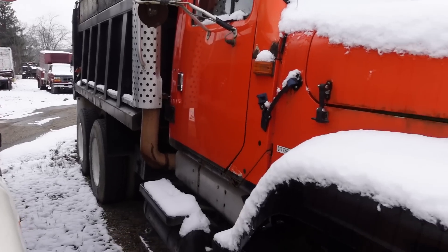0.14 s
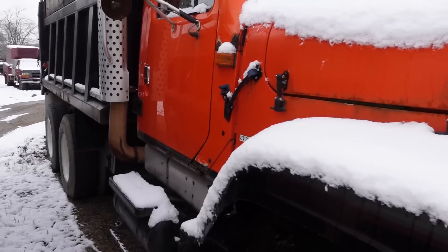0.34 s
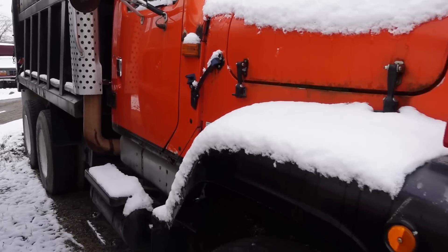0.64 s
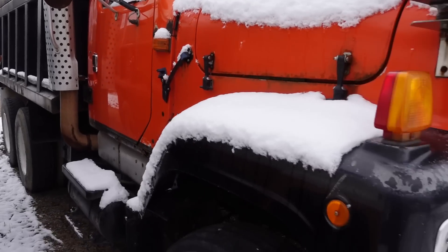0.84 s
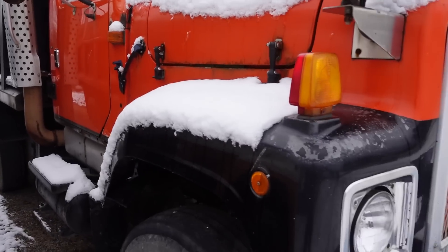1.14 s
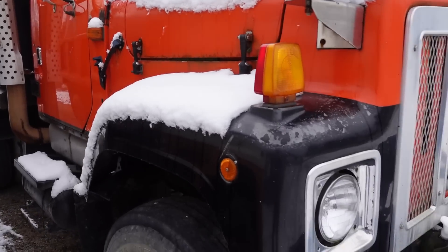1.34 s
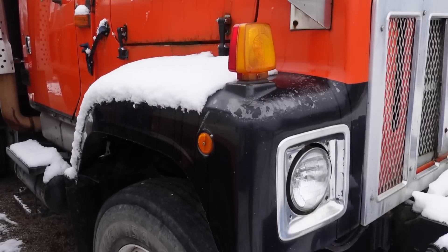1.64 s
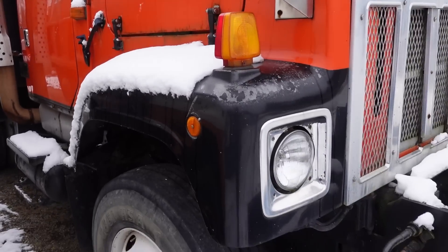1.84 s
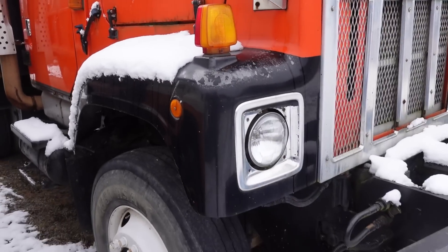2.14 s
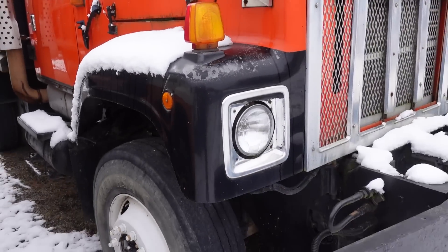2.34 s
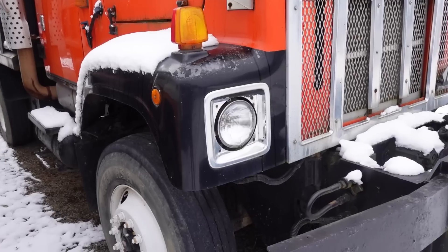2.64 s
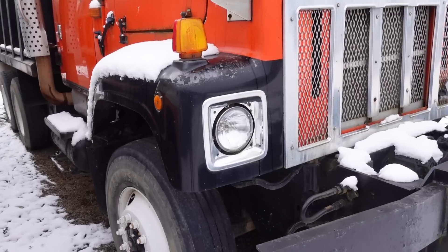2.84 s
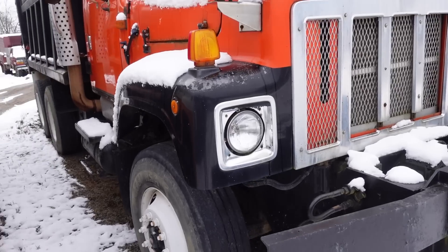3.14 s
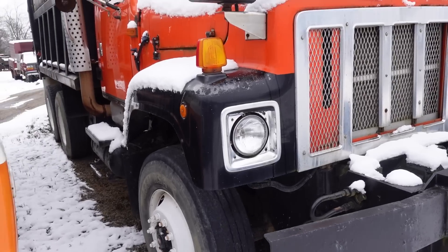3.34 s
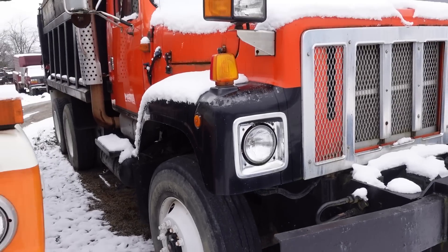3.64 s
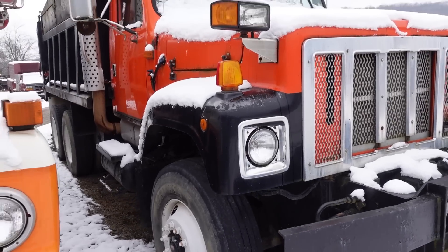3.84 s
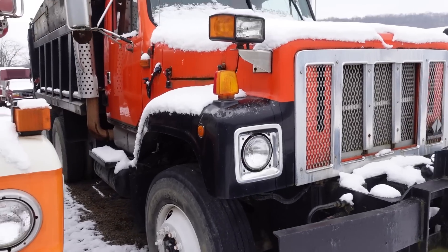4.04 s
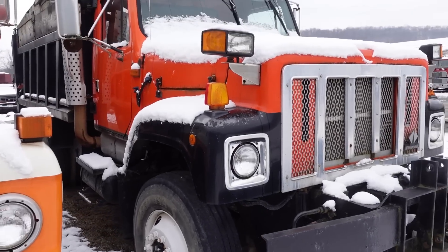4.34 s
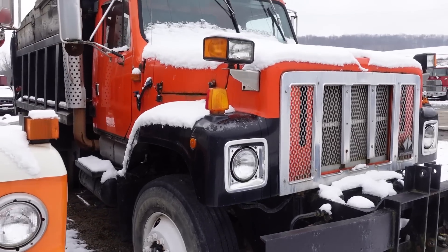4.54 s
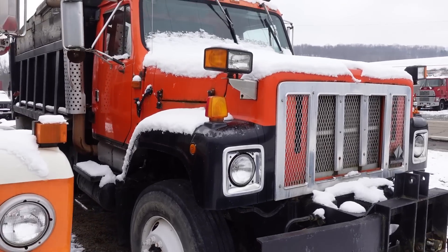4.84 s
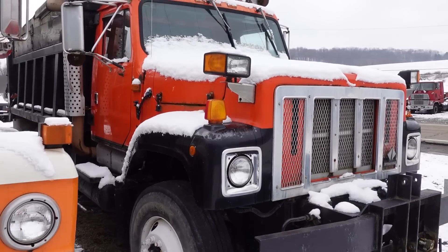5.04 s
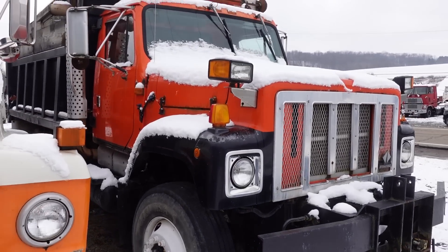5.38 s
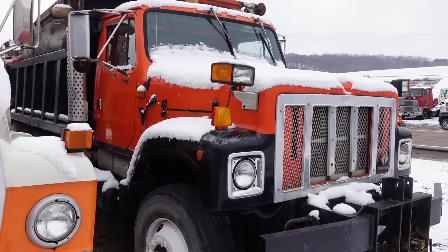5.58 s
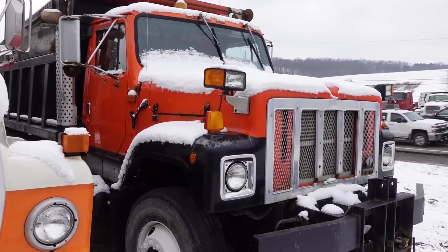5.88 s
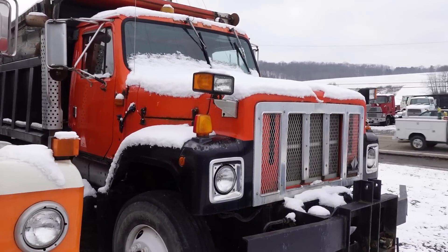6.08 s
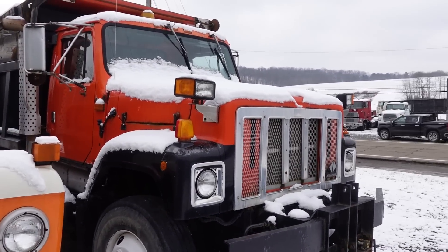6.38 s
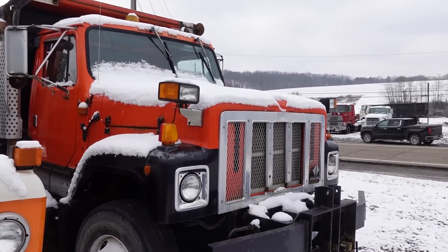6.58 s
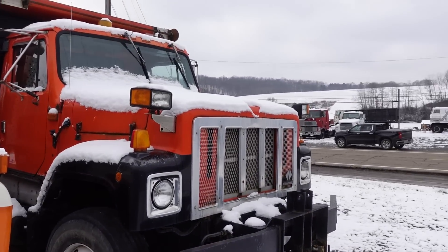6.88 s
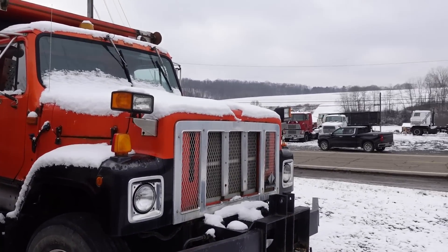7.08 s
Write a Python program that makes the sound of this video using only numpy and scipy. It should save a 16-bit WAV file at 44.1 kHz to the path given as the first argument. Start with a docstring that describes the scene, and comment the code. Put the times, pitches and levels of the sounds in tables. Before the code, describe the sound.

A heavy truck recedes on a slushy road with a sinking tyre whine, then cars and pickups hiss past in wet surges over faint distant traffic.

```python
"""Traffic passes on a slushy road, heard from between parked trucks in a snowy yard.
First a heavy truck recedes: its diesel drones and its tyres sing one sinking note; a drip ticks, a thin sizzle swells.
Then two cars pass, wheels slap through a rut, and two pickups follow; far traffic murmurs throughout.
Each vehicle is filtered noise: low rumble, tread roar, and droplet-laden spray and mist that dull with distance.
Splashes and howls are short bands of noise; engines and song are sines with wandering pitch."""
import sys
import numpy as np
from scipy import signal
from scipy.fft import rfft, irfft, next_fast_len
from scipy.io import wavfile

SR = 44100
rng = np.random.default_rng(int(sys.argv[2]) if len(sys.argv) > 2 else 0)


def master(y):
    """Save y as 16-bit WAV."""
    cut = np.clip(np.atleast_2d(y).T, -1, 1)
    pcm = np.round(cut * 32767)  # scale
    wavfile.write(sys.argv[1], SR, pcm.astype(np.int16))


N = 318137
TIME_S = np.arange(N) / SR
FREQ_HZ = np.maximum(np.fft.rfftfreq(next_fast_len(N, real=True), 1 / SR), 1)

# Truck, car, next car, two pickups. Each row: nearest at s, time to travel its nearest distance in s,
# clears the parked trucks at s, out of view at s, rumble, tread roar, spray and mist level in dB
# before wander, shadow and distance, left minus right in dB when nearest and its swing in dB, before pan share.
PASSES = [(0.14, 0.8, -2.0, -1.5, -28.8, -21.2, -33.4, -48.2, -7.3, 2.8),
          (3.29, 0.47, 2.7, 3.75, -40.3, -23.7, -30.5, -50.2, -5.5, -3.1),
          (4.38, 0.48, 3.6, 3.7, -48, -27.2, -46.3, -69.5, -6.8, 3.5),
          (6.33, 0.6, 5.59, 6.8, -37.4, -21.8, -29.6, -44.5, -4.5, -2.9),
          (7.2, 0.4, 6.65, 7.05, -52, -28.8, -43, -85, -6, -2)]
# Uneven slush: brief rises and dips of tyre noise. Each row: centre in s, 1/e half-width in s,
# tread roar change in dB, spray and mist change in dB, negative for a dip.
SLUSH_CHANGES = [(0.64, 0.05, 1.8, 1.2), (1.13, 0.17, 1.8, 0.3), (2.83, 0.08, 1.2, 0),
                 (3.17, 0.05, -0.2, 1.2), (3.33, 0.045, 1.2, 0.4), (3.68, .1, -1.5, 0),
                 (3.91, 0.07, 1.0, 1.4), (4.42, 0.1, 0.7, 1.0), (5.97, 0.04, -1.0, 1.2),
                 (6.17, 0.07, 1.3, 2.3), (6.28, .035, -1.4, -1.2), (6.36, 0.035, -0.3, 1.3),
                 (6.44, .035, .9, -1), (6.52, .05, -.5, -1.2), (6.66, .03, .8, .5), (6.79, 0.05, 1.0, 2.1)]
# Laws of the parts of tyre noise. Each: power of distance by which amplitude falls, extra time hidden in s,
# share of the pan, distance lag in s, time constant of coming out of the sound shadow in s.
RUMBLE_LAW = (1.9, 0.2, 0.15, .14, .12)
ROAR_LAW = (1.29, 0.0, 0.97, 0, .08)
SPRAY_LAW = (1.38, 0.31, 1.0, -.01, .07)
MIST_LAW = (2.45, 0.35, .95, -.06, .035)
# Carcass rumble spectra. Each row: frequency in Hz, relative density in dB.
TRUCK_RUMBLE = [(25, -50), (60, -25), (120, -13), (200, -7), (280, 1.5), (340, -2.5), (400, 0.5),
                (480, 2.5), (560, 9), (640, 7.5), (760, -3), (1000, -61)]
CAR_RUMBLE = [(25, -48), (60, -27), (110, -11.5), (180, -1), (260, 4.5), (340, -1), (410, -3), (490, 1),
              (600, 10), (900, -58)]
PICKUP_RUMBLE = [(25, -48), (60, -33), (110, -15), (190, -4), (300, -3), (400, 3.5), (480, 3.5), (600, -4),
                 (900, -48.5)]
# Tread roar spectra. Each row: frequency in Hz, relative density in dB.
TRUCK_TREAD = [(360, -42.5), (620, -2), (1100, -2.5), (1240, -6), (1350, -3.5), (2000, -9), (3000, -18),
               (3900, -57), (6600, -120)]
CAR_TREAD = [(260, -41), (450, -21), (562, -11), (623, -9.5), (803, -0.5), (1260, -1), (1360, -3.5),
             (1520, -4.5), (1720, -4), (3000, -17), (3900, -30), (6600, -120)]
NEXT_CAR_TREAD = [(260, -49), (450, -22), (536, -17), (566, -12), (623, -11), (742, -6.5), (856, -4.5),
                  (1240, -1.5), (1650, -3), (2070, -9), (3000, -21.5), (3900, -26), (6600, -120)]
PICKUP_TREAD = [(260, -47), (450, -21), (608, -3.5), (675, -5), (760, -1), (980, 0), (1080, -3.5),
                (1180, 0), (1900, -5.5), (3000, -13.5), (3900, -36), (6600, -120)]
LAST_PICKUP_TREAD = [(260, -40), (450, -16), (600, -4), (850, -2), (1200, -2), (1600, -1.5), (2100, -3),
                     (3000, -15), (3900, -26), (6600, -100)]
# Spray and finer mist spectra. Each row: frequency in Hz, relative density in dB.
TRUCK_SPRAY = [(1200, -30), (2200, -2.5), (2900, -1), (3600, -1), (4300, -6.5), (5400, -7), (6400, -15),
               (7500, -21.5), (10000, -48), (14000, -70)]
SPRAY = [(1200, -40), (2200, -2.6), (2900, -0.8), (3800, -2.6), (5000, -7.8), (6200, -16), (7500, -27.5),
         (10000, -52), (14000, -69)]
TRUCK_MIST = [(4500, -27), (6000, 1), (6800, -1.5), (7900, -3), (9200, -5.5), (10500, -16.5), (11500, -32),
              (13000, -50), (15500, -53)]
MIST = [(4500, -23), (6000, 0.5), (7000, 1), (8200, -2.5), (10000, -13.5), (11500, -24), (12600, -34),
        (13600, -44), (15500, -52)]
PICKUP_MIST = [(4500, -23), (6000, 1), (7000, 0.5), (8200, -3.5), (10000, -13), (11500, -18.5),
               (12600, -25), (13600, -42), (15500, -52)]
DIRECT_SHARE, HIDE_S = .72, .13  # direct sound while in view; time constant of going out of view


def tyres():
    """Treads pump air, carcasses rumble, and water is flung off as spray and mist."""
    slush = walk(14)  # uneven depth makes the spray surge
    roar_change_db = .6 * walk(11) + sum(db * swell(s, width_s) for s, width_s, db, _ in SLUSH_CHANGES)
    spray_change_db = sum(db * swell(s, width_s) for s, width_s, _, db in SLUSH_CHANGES)
    voices = [(TRUCK_RUMBLE, TRUCK_TREAD, TRUCK_SPRAY, TRUCK_MIST),
              (CAR_RUMBLE, CAR_TREAD, SPRAY, MIST),
              (CAR_RUMBLE, NEXT_CAR_TREAD, SPRAY, MIST),
              (PICKUP_RUMBLE, PICKUP_TREAD, SPRAY, PICKUP_MIST),
              (PICKUP_RUMBLE, LAST_PICKUP_TREAD, SPRAY, MIST)]
    out = 0
    for vehicle, (rumble, tread, spray, mist) in zip(PASSES, voices):
        _, _, _, gone_s, rumble_db, roar_db, spray_db, mist_db, _, _ = vehicle
        in_view = DIRECT_SHARE * (1 - opening(gone_s, HIDE_S))
        parts = [(turbulence, rumble, rumble_db, RUMBLE_LAW),
                 (turbulence, tread, roar_db + roar_change_db, ROAR_LAW),
                 (spatter, spray, spray_db + spray_change_db + .55 * slush, SPRAY_LAW),
                 (spatter, mist, mist_db + spray_change_db + .9 * slush, MIST_LAW)]
        for excite, colour, db, law in parts:
            noise = radiate(excite(), colour, in_view) * undb(db)
            out = out + drive_by(noise, vehicle, law)
    return out


def drive_by(x, vehicle, law):
    """A sound comes out from behind the parked trucks, swings across and fades with distance."""
    nearest_s, travel_s, clear_s, *_, left_db, swing_db = vehicle
    falloff, hidden_s, pan_share, later_s, emerge_s = law
    unshadowed = np.sqrt(opening(clear_s + hidden_s, emerge_s))
    gain = unshadowed / distance(vehicle, later_s) ** falloff
    sine_of_bearing = (TIME_S - nearest_s) / travel_s / distance(vehicle)
    return pan(x * gain, pan_share * (left_db + swing_db * sine_of_bearing))


def distance(vehicle, later_s=0):
    """Distance of a vehicle on the straight road, as a multiple of its nearest."""
    nearest_s, travel_s = vehicle[:2]
    return np.hypot(1, (TIME_S - nearest_s - later_s) / travel_s)


def spatter():
    """Torn water: a smooth hiss with droplets in it."""
    return turbulence() + .63 * droplets(per_s=5000, spread_db=2.0)


def droplets(per_s, spread_db):
    """Two showers of tiny impacts, many weak and a few strong."""
    hit = rng.random((2, N)) < per_s / SR
    size = undb(spread_db * np.minimum(rng.exponential(size=(2, N)), 5))
    return unit(hit * size * turbulence()) / np.sqrt(2)


# Front wheels throw up sheets of slush. Each row: centre in s, 1/e half-width in s, band centre in Hz,
# bandwidth at half amplitude in Hz (both before the shared colour), peak level in dB.
SPLASHES = [(0.03, .035, 5000, 1800, -39), (3.1, .035, 3200, 1900, -33), (3.21, .05, 2700, 900, -35),
            (5.96, .05, 3050, 800, -34.5), (6.36, .03, 2600, 900, -34), (6.8, .05, 2800, 1500, -36)]


def splashes():
    """Sheets of slush tear into droplets, each with a hiss in a band of its own."""
    colour = [(800, -20), (2000, 0), (6000, 0), (12000, -25)]  # Hz, dB
    out = 0
    for s, width_s, hz, width_hz, db in SPLASHES:
        sheet = shaped(spatter(), 1 / (1 + (2 * (FREQ_HZ - hz) / width_hz) ** 2))
        out = out + radiate(sheet, colour) * undb(db) * swell(s, width_s)
    return pan(out, -5)


# Treads howl on patches of wet road. Each row: centre in s, 1/e half-width in s, pitch at the centre in Hz,
# bandwidth at half amplitude in Hz, peak level in dB.
HOWLS = [(0.55, .14, 345, 26, -37), (0.66, .15, 770, 110, -31), (1.1, .1, 1120, 130, -32),
         (1.3, .12, 830, 160, -35), (1.76, .14, 1020, 150, -36), (2.305, .08, 900, 60, -40),
         (3.32, .09, 798, 80, -31.5), (3.35, .06, 1060, 90, -28), (3.38, .11, 1370, 70, -33),
         (3.95, .16, 1520, 240, -29.8), (4.42, .09, 1330, 170, -30), (4.55, .12, 1160, 220, -31.5),
         (4.8, .07, 1250, 200, -35), (4.6, .24, 1660, 300, -35.5), (5.74, .07, 900, 180, -34),
         (6.17, .06, 860, 160, -29), (6.44, .05, 1040, 180, -29), (7.13, .05, 830, 130, -28.5)]
HOWL_SAG_PER_S = .1  # exponential rate of pitch fall


def howls():
    """Tread grooves ring in a narrow band for a moment, sinking as the wheel goes by."""
    out = 0
    for s, width_s, hz, width_hz, db in HOWLS:
        flutter = shaped(turbulence(), 1 / (1 + (2 * FREQ_HZ / width_hz) ** 2))
        pitch_hz = hz * np.exp(-HOWL_SAG_PER_S * (TIME_S - s))
        phase = 2 * np.pi * np.cumsum(pitch_hz) / SR
        ring = unit(flutter[0] * np.cos(phase) + flutter[1] * np.sin(phase))
        out = out + ring * undb(db) * swell(s, width_s)
    return pan(out, -6.5)


# Stretches of road on which the truck tyres sing out.
# Each row: centre in s, 1/e half-width in s, added amplitude in dB before flutter.
SONG_SWELLS = [(0.02, 0.04, -28), (0.33, .1, -33), (0.61, 0.045, -30), (0.81, 0.035, -31.5),
               (1.355, .025, -34), (1.415, .025, -32.5), (1.475, .02, -28), (1.548, 0.024, -25.5),
               (1.63, 0.026, -32), (2.065, 0.042, -35.5), (2.25, .08, -47), (2.72, 0.13, -40.5)]
SONG_FAR_HZ, SONG_NEAREST_DB, SONG_FALLOFF = 569.5, -34.5, 1.0  # falloff: power of distance


def tyre_song():
    """The truck's regular tread blocks sing one note, which sinks, flutters and fades slowly as it leaves."""
    hz = SONG_FAR_HZ * doppler() * (1 + .003 * walk(25))
    steady = undb(SONG_NEAREST_DB + 1.6 * walk(9)) / distance(PASSES[0]) ** SONG_FALLOFF
    strength = steady + sum(undb(db) * swell(s, width_s) for s, width_s, db in SONG_SWELLS)
    flutter = undb(1.4 * walk(35))
    return pan(tone(hz) * strength * flutter, -4.0)


# Truck diesel. Each row: multiple of the crank rate, relative level in dB.
DIESEL_ORDERS = [(3, -20), (4, -12.5), (5, -6), (6.5, -10), (8.5, -2), (9, -5), (9.5, -3), (11, -8),
                 (15, -5)]
CRANK_FAR_HZ, DIESEL_NEAREST_DB, DIESEL_FALLOFF = 30.0, -36, 2.05
# Exhausts drone while they face the yard. Each row: start in s, end in s, pitch at the start in Hz,
# fall in Hz per s, rms pitch roughness as a share, level in dB before wander.
DRONES = [(3.28, 4.0, 222, 28, .08, -51), (3.7, 3.95, 204, 10, .012, -52), (5.85, 7.3, 91, 3, .025, -66),
          (6.33, 6.88, 408, 15, .015, -48)]
DRONE_FADE_S = .022  # time constant


def engines():
    """The diesel's crank orders waver in pitch and level; the other exhausts are rough falling drones."""
    diesel = 0
    for order, db in DIESEL_ORDERS:
        hz = order * CRANK_FAR_HZ * doppler() * (1 + .011 * walk(20))
        diesel = diesel + tone(hz) * undb(db + 3 * walk(6))
    out = unit(diesel) * undb(DIESEL_NEAREST_DB) / distance(PASSES[0]) ** DIESEL_FALLOFF
    for start_s, end_s, start_hz, sag_hz_per_s, rough, db in DRONES:
        facing = opening(start_s, DRONE_FADE_S) - opening(end_s, DRONE_FADE_S)
        hz = (start_hz - sag_hz_per_s * (TIME_S - start_s)) * (1 + rough * walk(55))
        out = out + tone(hz) * facing * undb(db + 2.8 * walk(25))
    return pan(out, -.6)


DOPPLER_SHARE, RECEDE_S = .044, .62  # pitch excess at the start; its decay time constant


def doppler():
    """Pitch of the receding truck as a multiple of its far pitch."""
    return 1 + DOPPLER_SHARE * np.exp(-TIME_S / RECEDE_S)


def tone(hz):
    """A sine of rms 1 that follows a pitch curve."""
    return np.sqrt(2) * np.sin(2 * np.pi * np.cumsum(hz) / SR)


# Wheels slap through a rut. Each row: start in s, level in dB before the decay, decay time constant in s.
SLAPS = [(4.812, -34, .008), (4.856, -31.5, .008), (4.872, -31, .009), (4.988, -38, .006),
         (5.092, -31, .002)]


def slaps():
    """Dull knocks of tyres on an uneven patch: low-mid noise in short bursts."""
    colour = [(100, -20), (250, -5), (450, -6), (800, 1), (1400, -2), (2200, -16), (5000, -35), (12000, -70)]
    knock = radiate(turbulence(), colour)
    envelope = sum(undb(db) * burst(s, decay_s) for s, db, decay_s in SLAPS)
    return pan(knock * envelope, -2)


def drip(s, db, decay_s):
    """One faint tick, like a drop of melt water landing near by."""
    colour = [(4000, -25), (6500, 2), (9500, 0), (11500, -18), (15000, -38)]  # Hz, dB
    return radiate(turbulence(), colour) * burst(s, decay_s) * undb(db)


def burst(s, decay_s):
    """Envelope of a small impact: a quick rise and an exponential fall."""
    age_s = np.maximum(TIME_S - s, 0)
    return np.minimum(age_s / .0011, 1) * np.exp(-age_s / decay_s)


# Sizzle level. Each row: time in s, level in dB before wander and pan.
SIZZLE = [(1.6, -82), (1.78, -77), (1.88, -66), (1.96, -65), (2.06, -59), (2.14, -63), (2.32, -59),
          (2.46, -59.5), (2.6, -56.5), (2.72, -53), (2.86, -73), (3.2, -84)]
# Sizzle spectrum. Each row: frequency in Hz, relative density in dB.
SIZZLE_COLOUR = [(2500, -5), (3400, 20), (4600, 12), (6500, 9), (8000, 6), (10000, -1), (11200, 0.5),
                 (13300, 2.5), (14400, -10), (16000, -10)]


def sizzle():
    """A thin treble noise swells unevenly and dies away."""
    level_db = curve(SIZZLE) + 1.1 * walk(20)
    return pan(radiate(turbulence(), SIZZLE_COLOUR) * undb(level_db), 4)


# Far engines and tyres. Each row: time in s, level in dB before wander.
FAR_LEVEL = [(0, -62), (2.0, -60), (2.8, -67), (4.2, -56), (5.3, -52)]
# Far traffic spectrum. Each row: frequency in Hz, relative density in dB.
FAR_TRAFFIC = [(20, -48), (45, -38), (68, -11), (90, -1), (115, -1), (160, 4), (250, 3), (350, -9),
               (450, -7), (570, 1), (850, 4), (1800, -20), (5000, -50)]


def far_traffic():
    """Distant engines and tyres blend into a low murmur of noise, ebbing and growing."""
    level_db = curve(FAR_LEVEL) + 1.2 * walk(2)
    return radiate(turbulence(), FAR_TRAFFIC) * undb(level_db)


# Likeness of the two ears for bounced sound. Each row: frequency in Hz, correlation before the bounce phase.
LIKENESS = [(100, .998), (290, 0.985), (560, .93), (850, .81), (1500, 0.67), (3000, .5), (5500, 0.32),
            (12000, 0.3)]
# Bounces between the parked trucks. Each row: frequency in Hz, lead of the left ear in radians.
BOUNCE_PHASE = [(400, 0), (900, .12), (1600, .2), (3000, -.38), (5200, -.9), (12000, -1.1)]


def radiate(pair, colour, in_view=0):
    """Colour two unrelated signals: direct sound is alike in both ears, bounced is diffuse in the treble."""
    alike = np.clip(over_freq(LIKENESS), 0, 1)
    mid, side = shaped(pair, undb(over_freq(colour)) * np.sqrt([1 + alike, 1 - alike]))
    left = shaped(mid + side, np.exp(1j * over_freq(BOUNCE_PHASE)))
    bounced = np.array([left, mid - side])
    return unit(in_view * mid + (1 - in_view) * bounced)


def pan(x, left_db):
    """Lean a sound to one side, keeping the mean of the two gains at 1."""
    gains = undb(np.array([[.5], [-.5]]) * left_db)
    return x * gains / gains.mean(axis=0)


def turbulence():
    """Two unrelated white noises."""
    return rng.standard_normal((2, N))


def walk(rate_hz):
    """Smooth random wander of rms 1, its spectrum halved at rate_hz."""
    return unit(shaped(rng.standard_normal(N), 1 / (1 + (FREQ_HZ / rate_hz) ** 4)))


def swell(s, width_s):
    """A bell-shaped rise and fall around a moment."""
    return np.exp(-((TIME_S - s) / width_s) ** 2)


def opening(s, edge_s):
    """A soft step from 0 to 1."""
    return .5 + .5 * np.tanh((TIME_S - s) / (2 * edge_s))


def shaped(x, gain):
    """Filter by a gain for each frequency."""
    size = next_fast_len(N, real=True)
    return irfft(rfft(x, size) * gain, size)[..., :N]


def over_freq(points):
    """Points joined on a log-frequency axis."""
    hz, value = np.transpose(points)
    return np.interp(np.log(FREQ_HZ), np.log(hz), value)


def curve(rows):
    """Timed values joined by straight lines, sample by sample."""
    s, value = np.transpose(rows)
    return np.interp(TIME_S, s, value)


def unit(x):
    """Scale so that the middle of the stereo image has standard deviation 1."""
    return x / np.std(np.atleast_2d(x).mean(axis=0))


def undb(db):
    """Decibels to gain."""
    return 10 ** (np.asarray(db) / 20)


def scene():
    """Everything on and around the road."""
    road = tyres() + splashes() + howls() + tyre_song() + engines() + slaps()
    return road + drip(s=.495, db=-39, decay_s=.005) + sizzle() + far_traffic()


def record(dry):
    """A steep elliptic low-pass removes the top of the treble."""
    top_hz, ripple_db, stop_db = 15600, .2, 70
    return signal.sosfilt(signal.ellip(8, ripple_db, stop_db, top_hz, fs=SR, output="sos"), dry)


dry = scene()
out = record(dry)
master(out)
```